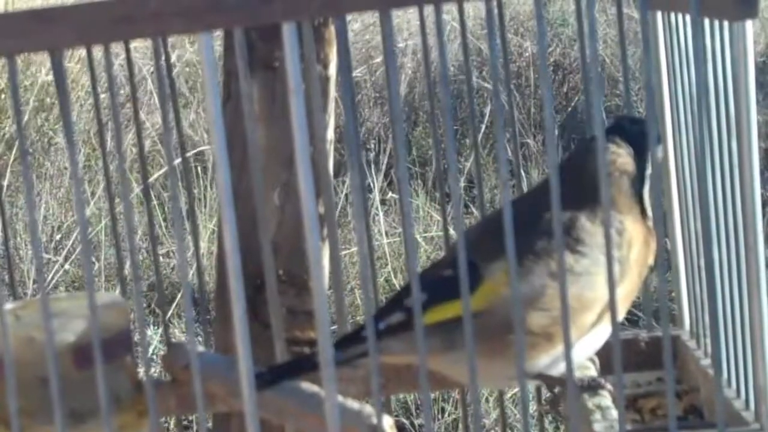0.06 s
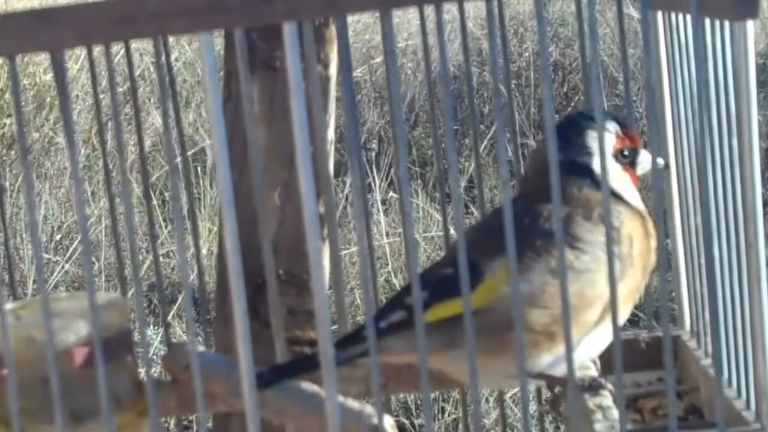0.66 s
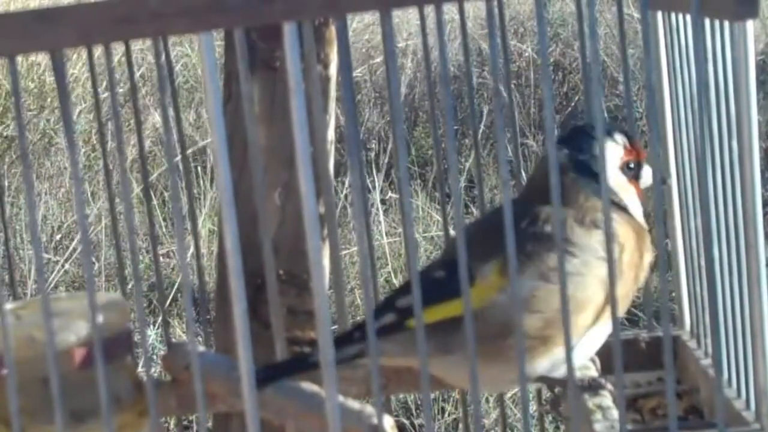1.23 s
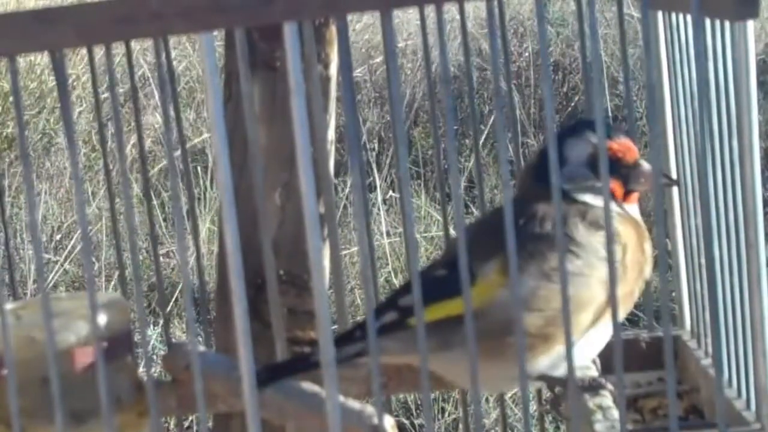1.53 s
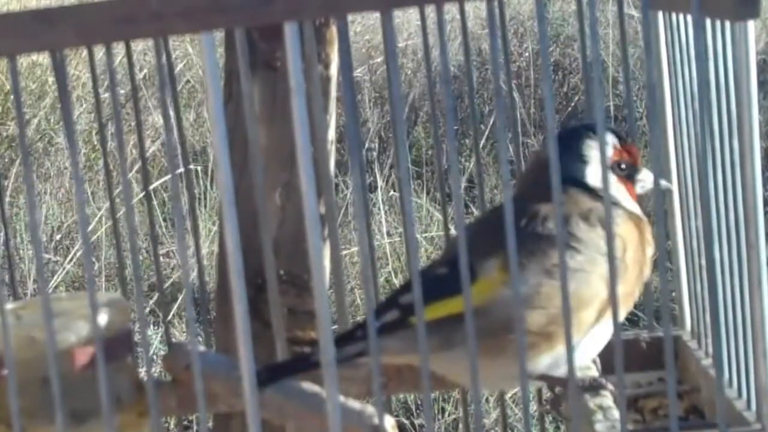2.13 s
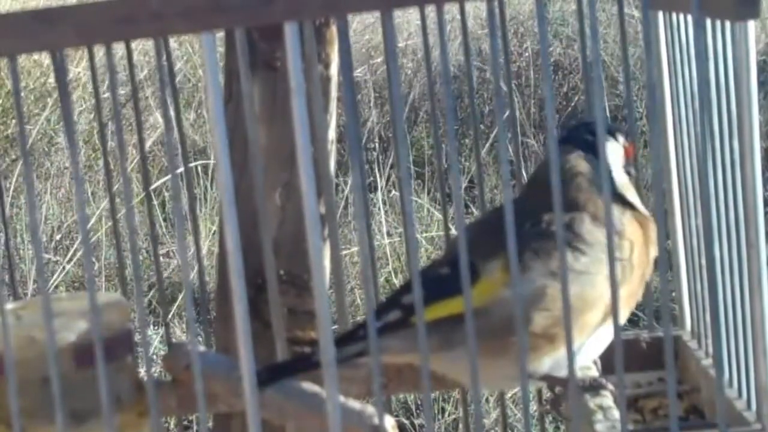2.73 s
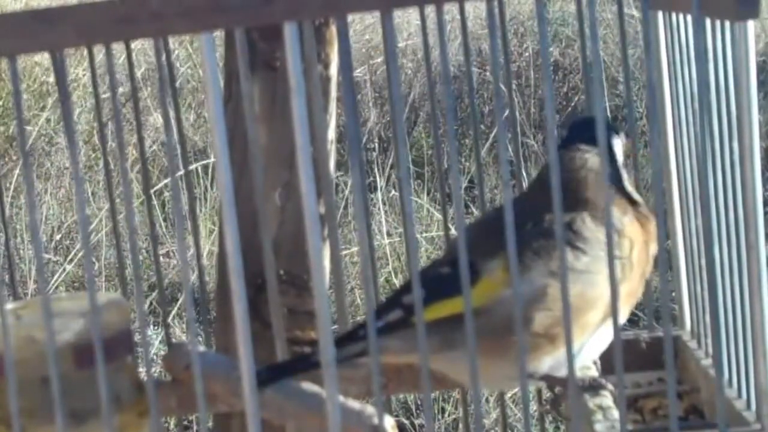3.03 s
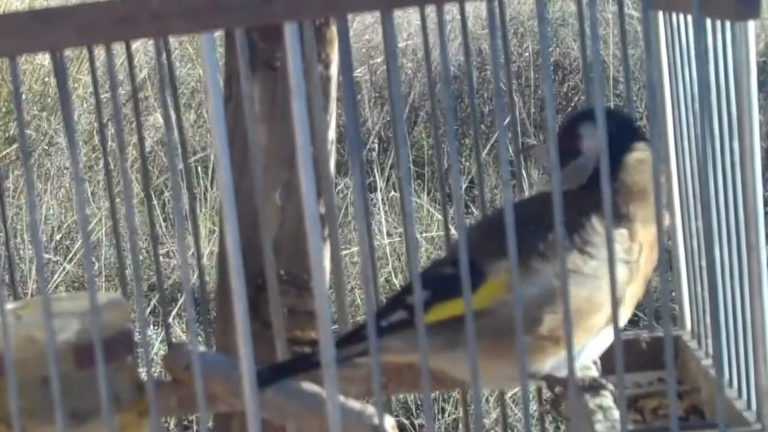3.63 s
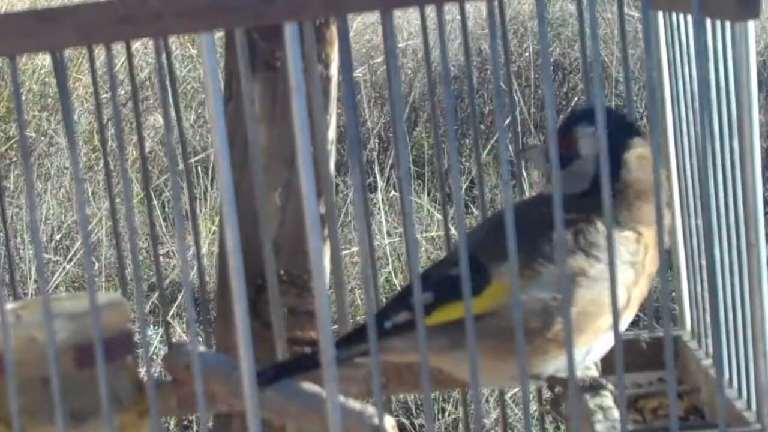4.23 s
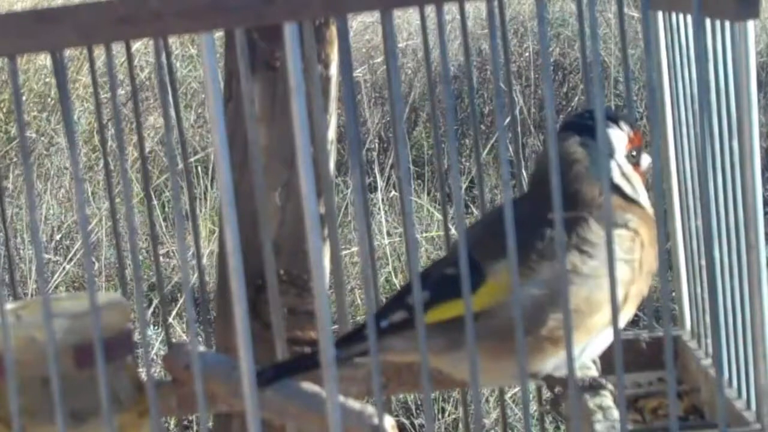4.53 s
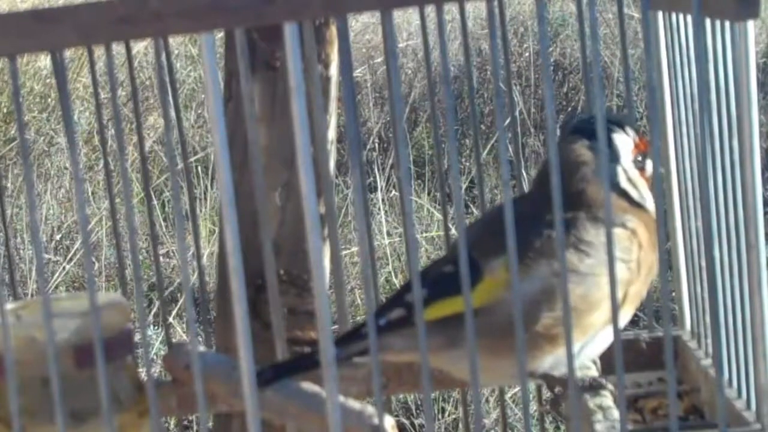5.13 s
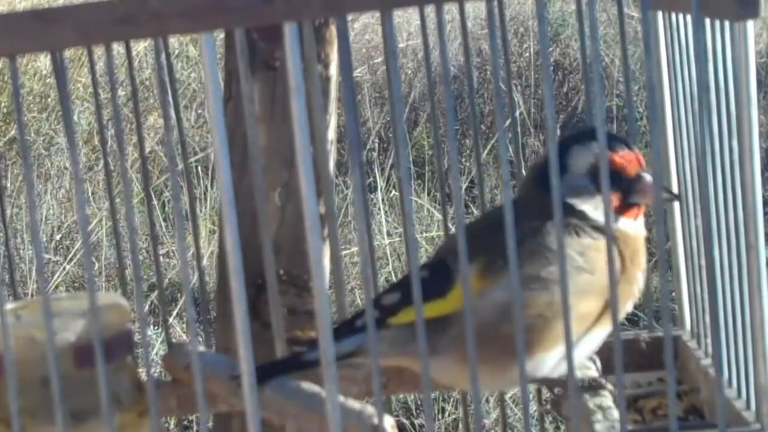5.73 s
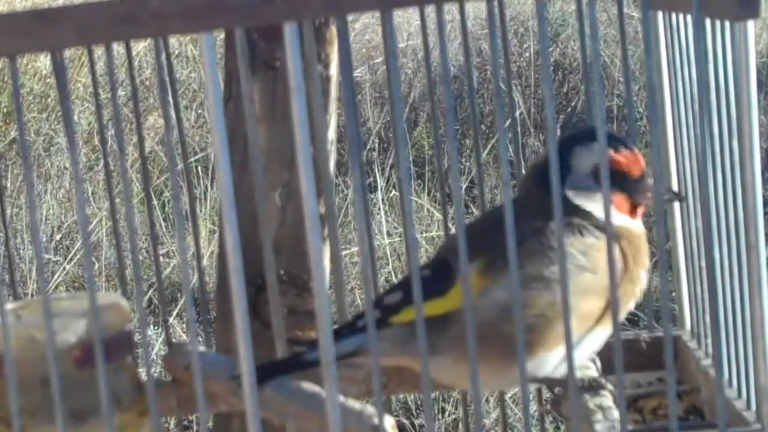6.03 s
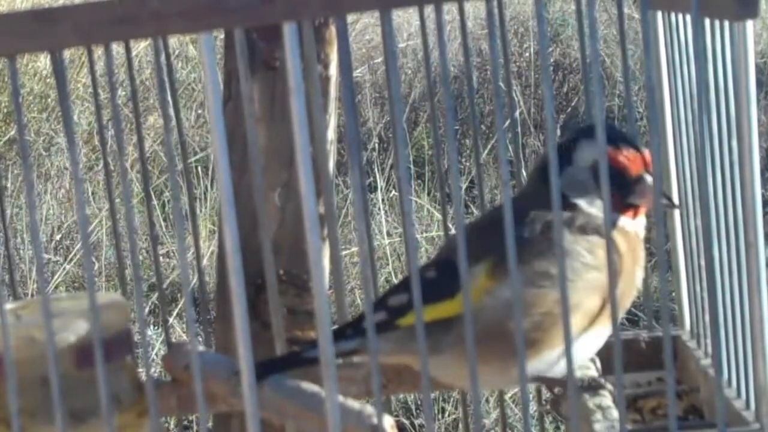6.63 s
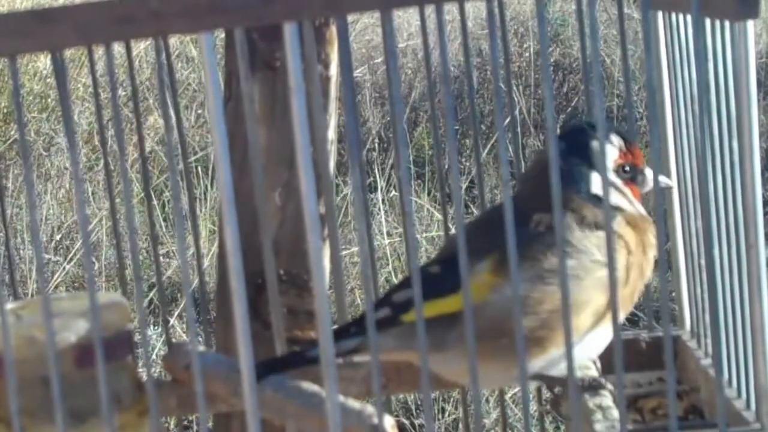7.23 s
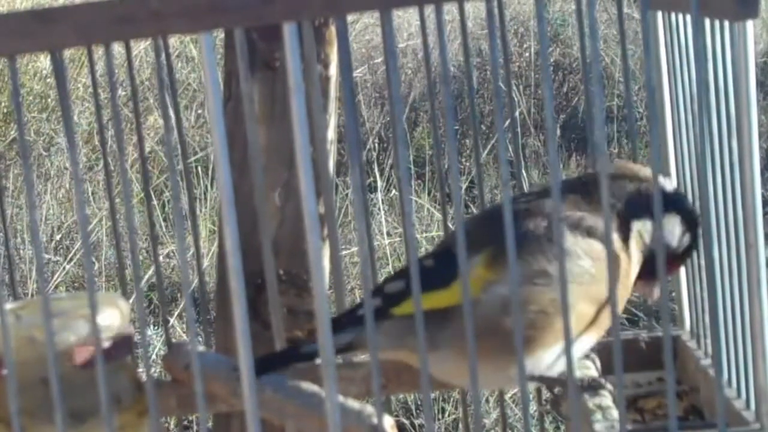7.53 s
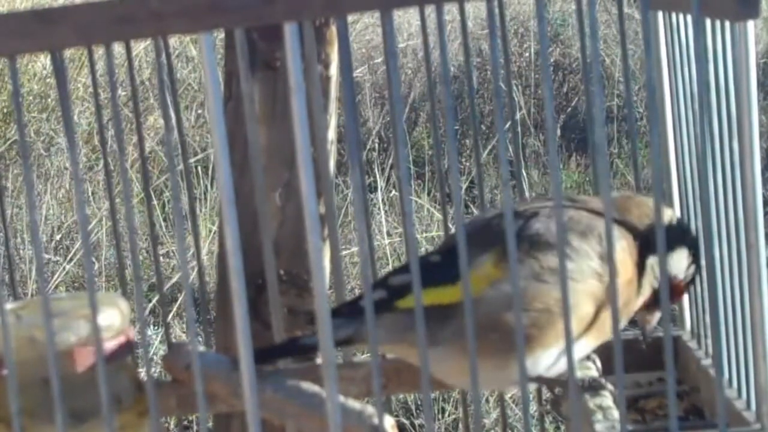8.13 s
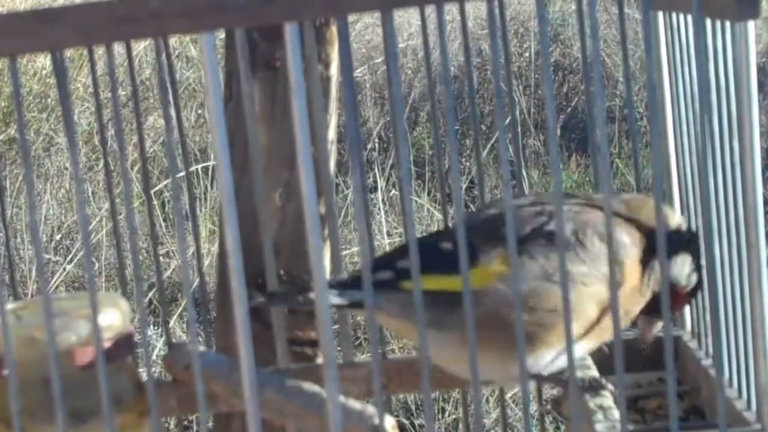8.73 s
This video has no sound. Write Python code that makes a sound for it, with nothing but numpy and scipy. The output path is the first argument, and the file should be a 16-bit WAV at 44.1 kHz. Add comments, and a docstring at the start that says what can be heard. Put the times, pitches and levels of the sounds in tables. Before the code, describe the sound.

A small caged finch chirps six times up close, each note brief, high and sharp, most with a soft rasping trail. Four come singly, then the wire cage gives one short ringing rattle, then two more follow in quick succession. Before and after, faraway birds answer each other with faint gliding notes. Underneath are a quiet outdoor hush, tiny claw and beak ticks, and light wind bumps on the microphone.

```python
"""A dry field under a quiet hush. Beak and claws tick on a cage, distant birds answer one another with
gliding notes, each echoed twice, and light puffs of wind bump the microphone. Near 2 s a thin whistle
rises far off. From 2.7 s a caged goldfinch, up close, gives six short, sharp calls: sweeps of its syrinx
coloured by throat and beak, most with a softer, rasping trail. Between the fourth and fifth call the
cage rattles once and rings. The distant birds have the last notes."""
import sys
import numpy as np
from scipy import signal
from scipy.fft import rfft, irfft, next_fast_len
from scipy.io import wavfile
from scipy.ndimage import map_coordinates

SR = 44100
rng = np.random.default_rng(int(sys.argv[2]) if len(sys.argv) > 2 else 0)


def put_to_file(sound):
    """Save the sound as 16-bit audio at rate SR, in the file named by the first command-line argument."""
    columns = np.atleast_2d(sound).T  # one column per channel
    safe = np.clip(columns, -1, 1)
    whole_steps = np.round(safe * 32767)
    wavfile.write(sys.argv[1], SR, whole_steps.astype(np.int16))


N = 391166
TIME = np.arange(N) / SR


def undb(db):
    """Decibels to gain."""
    return 10 ** (np.asarray(db) / 20)


def unit(x):
    """Scale to rms 1."""
    return x / np.sqrt(np.mean(x ** 2))


def add(out, start_s, sound):
    """Mix a sound in at a given time."""
    i = max(int(start_s * SR), 0)
    out[i:i + len(sound)] += sound[:max(len(out) - i, 0)]


def delay(x, lag_s):
    """The same sound, later."""
    return np.pad(x, (int(lag_s * SR), 0))[:N]


def decay(t, t60_s):
    """An envelope that falls 60 dB in t60_s."""
    return np.exp(-np.log(1000) * t / t60_s)


def walk(rate_hz, size):
    """A smooth random wobble with a spread of about 1."""
    knots = rng.standard_normal(int(size * rate_hz / SR) + 4)
    return map_coordinates(knots, [np.arange(size) * rate_hz / SR + 1], order=2)


def band(x, hz, octaves):
    """A band-pass, bell-shaped on a log-frequency axis."""
    size = next_fast_len(len(x))
    f = np.maximum(np.fft.rfftfreq(size, 1 / SR), 1)
    bell = np.exp(-.5 * (np.log2(f / hz) / octaves) ** 2)
    return irfft(rfft(x, size) * bell, size)[:len(x)]


def scatter(x, t60_s):
    """A short diffuse tail from bars, grass and ground."""
    t = TIME[:SR // 3]
    response = rng.standard_normal(len(t)) * decay(t, t60_s) * (1 - np.exp(-t / .003))
    return signal.fftconvolve(x, response / np.linalg.norm(response))[:N]


def glide(size, *points_hz):
    """Pitch along one smooth arc through evenly spaced points."""
    count = len(points_hz)
    arc = np.polyfit(np.linspace(0, 1, count), points_hz, count - 1)
    return np.polyval(arc, np.linspace(0, 1, size))


def hush(start_db=-54.5, ease_db_per_s=0.1344):
    """The outdoor bed: dark noise that eases off very slightly."""
    # tone of the hush: frequency_hz, relative_db
    spectrum = [(20, 3.5), (32, -8.5), (65, -9), (120, -12.5), (300, -14), (600, -15.5), (1200, -19.5),
                (2500, -22), (5000, -26.5), (10000, -30), (13800, -36.5)]
    hz, db = np.transpose(spectrum)
    size = next_fast_len(N)
    f = np.maximum(np.fft.rfftfreq(size, 1 / SR), 1)
    colour = undb(np.interp(np.log(f), np.log(hz), db))
    noise = irfft(rfft(rng.standard_normal(size)) * colour, size)[:N]
    return unit(noise) * undb(start_db - ease_db_per_s * TIME)


def click(db, hz, octaves, t60_s, rise_share=0.0699):
    """A brief burst coloured by a broad resonance; longer ones also start more softly."""
    t = TIME[:SR // 12]
    envelope = (1 - np.exp(-t / (rise_share * t60_s))) * decay(t, t60_s)
    burst = envelope * band(rng.standard_normal(len(t)), hz, octaves)
    return undb(db) * burst / np.abs(burst).max()


def ticks():
    """Tiny dry contacts of beak, claws and perch that die within milliseconds."""
    # contacts in the cage: start_s, peak_db, centre_hz, width_octaves, t60_s
    contacts = [(0.193, -43, 3000, 0.54, 0.063), (.512, -45.5, 7000, 0.43, 0.014),
                (1.164, -43.5, 7500, 0.74, 0.0099), (1.222, -33, 1020, 0.41, 0.0093),
                (1.222, -43.5, 7000, .6, 0.011), (1.267, -44, 5000, 1.1, 0.033),
                (1.727, -42, 6500, 0.64, 0.011), (2.385, -33, 7000, 1.5, 0.0073),
                (2.767, -42, 2900, 1, 0.02), (2.987, -49, 7000, 1, .015), (3.438, -49, 8000, 0.93, 0.0091),
                (4.015, -37, 6960, 0.58, 0.0081), (4.412, -47, 8000, 1, .012),
                (5.799, -45.5, 3990, 0.81, 0.018), (5.899, -47, 8000, 1.2, 0.011),
                (6.1675, -41, 9500, 0.7, 0.011), (7.219, -36.5, 7400, 0.4, 0.0069),
                (7.5733, -35.5, 7800, 0.49, 0.0072)]
    out = np.zeros(N)
    for start_s, db, hz, octaves, t60_s in contacts:
        add(out, start_s, click(db, hz, octaves, t60_s))
    return out


def far_birds(near_echo_s=.031, far_echo_s=.113, far_echo_db=-17, grass_db=-9.5, tail_db=-14,
              waver_db=0.1, jitter_hz=50):
    """Wavering glides, echoed by two surfaces; overlapping pairs are the two sides of one syrinx."""
    # distant notes: start_s, length_s, start_hz, middle_hz, end_hz, level_db, octave_db, near_echo_db
    notes = [ (.211, 0.041, 5920, 5620, 5300, -30.5, -30, -23),
             (.212, 0.035, 6300, 6420, 6070, -41.5, -22, -14),
             (0.651, 0.038, 5910, 5790, 5650, -49, -14, -13),
             (3.028, 0.028, 2480, 2980, 3160, -44, -11, -15),
             (3.174, 0.015, 2880, 3010, 3090, -52, -25, -14),
             (4.004, 0.046, 2080, 3670, 5200, -42.5, -19, -7),
             (5.498, 0.024, 2900, 3250, 3680, -50.5, -18, -4),
             (6.134, 0.018, 2720, 2770, 2920, -48, -25, -18),
             (6.738, 0.045, 2730, 3020, 3550, -57, -27, -14),
             (6.764, 0.045, 3300, 3830, 5030, -47, -24, -3),
             (7.254, 0.048, 6480, 5870, 5440, -44, -19, -11),
             (7.264, 0.03, 5980, 4830, 4270, -45, -15.5, -5),
             (7.67, 0.057, 5600, 6350, 4970, -64, -26, -12.5),
             (7.728, 0.028, 4650, 4200, 3850, -62, -25, -3),
             (7.832, 0.026, 4500, 4650, 4640, -62, -25, -15)]
    direct, near_echo = np.zeros(N), np.zeros(N)
    for start_s, length_s, *arc_hz, db, octave_db, near_echo_db in notes:
        size = int(length_s * SR)
        hz = glide(size, *arc_hz) + jitter_hz * walk(520, size)
        phase = 2 * np.pi * np.cumsum(hz) / SR
        swell = np.sin(np.linspace(0, np.pi, size)) * undb(db + waver_db * walk(216, size))
        note = swell * (np.sin(phase) + undb(octave_db) * np.sin(2 * phase))
        add(direct, start_s, note)
        add(near_echo, start_s + near_echo_s, undb(near_echo_db) * note)
    out = direct + near_echo + undb(far_echo_db) * delay(direct, far_echo_s)
    # paths through the grass arrive just behind the note and roughen it
    grass = undb(grass_db) * scatter(out, t60_s=0.099)
    return out + grass + undb(tail_db) * scatter(out, t60_s=0.2)


def wind(rumble_hz=120, octaves=0.75, calm_db=-74):
    """Eddies at the microphone: single pressure swings over a low rumble that swells with each puff."""
    # puffs of the breeze: crest_s, level_db, width_s
    gusts = [(.42, -56, .035), (1.12, -49, .018), (3.14, -58, 0.061), (4.04, -47.5, 0.07),
             (4.29, -55, 0.047), (6.96, -52, 0.11)]
    # eddies bumping the microphone: centre_s, peak_db, pitch_hz
    bumps = [(1.13, -42.5, 225), (3.126, -36, 200), (3.131, -41, 330), (3.955, -44, 100), (3.996, -42, 85),
             (4.032, -35, 152), (4.04, -41, 286), (4.079, -45, 130), (4.186, -44, 190), (4.299, -43.5, 80),
             (4.313, -46, 110), (6.9554, -33.5, 152), (6.973, -41, 150), (7.021, -40, 115)]
    puffs = sum(undb(db) * np.exp(-np.abs(TIME - crest_s) / width_s) for crest_s, db, width_s in gusts)
    out = (undb(calm_db) + puffs) * unit(band(rng.standard_normal(N), rumble_hz, octaves))
    for centre_s, db, hz in bumps:
        phase = 2 * np.pi * hz * (TIME - centre_s)
        near = np.abs(phase) < 2 * np.pi
        out[near] += undb(db) * phase[near] * np.exp((1 - phase[near] ** 2) / 2)
    return out


def whistler(tail_db=-13, pitch_waver=.005, waver_db=2.5, fade_s=.012):
    """A thin, wavering whistle from across the field, in two parts."""
    # the faint opening: time_s, pitch_hz, level_db
    opening = [(1.765, 2520, -70), (1.775, 2290, -67), (1.873, 2380, -69), (1.895, 2413, -71)]
    # the longer rise: time_s, pitch_hz, level_db
    rise = [(1.95, 2669, -60), (1.966, 2770, -60), (1.988, 2669, -61), (2.06, 2759, -60),
            (2.112, 2890, -57.5), (2.184, 2934, -55.5), (2.252, 2985, -57.5), (2.275, 3000, -70)]
    out = np.zeros(N)
    for part in (opening, rise):
        time_s, hz, db = np.transpose(part)
        t = TIME[int(time_s[0] * SR):int(time_s[-1] * SR)]
        pitch_hz = np.interp(t, time_s, hz) * (1 + pitch_waver * walk(59, len(t)))
        tone = unit(np.sin(2 * np.pi * np.cumsum(pitch_hz) / SR))
        fade = np.clip(np.minimum(t - t[0], t[-1] - t) / fade_s, 0, 1)
        swell = undb(np.interp(t, time_s, db) + waver_db * walk(40, len(t)))
        add(out, time_s[0], fade * swell * tone)
    return out + undb(tail_db) * scatter(out, t60_s=0.2)


def syllable(t, attack_s, arc_hz, second_db, third_db, rough, fundamental=1, flutter=0,
             jitter=0.015, shimmer_db=1., throb_db=1.7):
    """One sweep of the syrinx: effort swells and falls as harmonics slide through throat resonances."""
    # what throat and beak let through: frequency_hz, gain_db
    throat = [(1900, -7), (2500, -1.5), (3300, 1), (4200, 4), (5300, 1), (6200, 2), (7100, -6.5),
              (8100, -2), (10000, -4), (11000, -4), (14000, -11)]
    throat_hz, throat_db = np.transpose(throat)
    effort = np.interp(t, [0, attack_s, t[-1]], [0, 1, 0]) * undb(rough * throb_db * walk(400, len(t)))
    hz = glide(len(t), *arc_hz) * (1 + rough * jitter * walk(1500, len(t)))
    phase = 2 * np.pi * np.cumsum(hz) / SR + flutter
    overtones_db = [second_db, third_db, third_db - 6, third_db - 7]
    # overtones grow faster with effort than the fundamental
    gains = [fundamental * effort ** 0.69] + [undb(db) * effort ** 0.99 for db in overtones_db]
    tone = 0
    for k, gain in enumerate(gains, 1):
        colour_db = np.interp(np.log(k * hz), np.log(throat_hz), throat_db)
        flicker_db = k * rough * shimmer_db * walk(700, len(t))  # higher harmonics are less steady
        tone = tone + gain * undb(colour_db + flicker_db) * np.sin(k * phase)
    return tone * (1 + flutter)


def syrinx(break_s=0.0012, lead_s=.0045, lead_db=-27.5,
           trail_rough=0.83, trail_attack_share=0.41, flutter_hz=450, flutter_spread=.3):
    """Chirps that change register, fluttering trails and snaps; returns the voice and a hiss envelope."""
    # the sharp sweep of each call: start_s, length_s, attack_s, start_hz, one_third_hz, two_thirds_hz,
    # end_hz, level_db, second_harmonic_db, third_harmonic_db, change_after_s, step_db, roughness (0-1)
    chirps = [(2.6547, 0.029, 0.022, 2365, 2807, 3346, 3880, -10.5, -13, -18.5, 0.021, -5, 0.9),
              (3.6688, 0.0285, 0.015, 2110, 2510, 2796, 2850, -15.5, -18.5, -17.5, 0.0119, -17, 0.43),
              (4.7501, 0.03, 0.0063, 3010, 2315, 2020, 2050, -29, -7.5, -11.5, 0.024, -1, 0.3),
              (5.1466, 0.027, 0.012, 2246, 2480, 2742, 2620, -14.5, -2.5, -7, 0.019, -18, 0.32),
              (6.4863, 0.025, 0.013, 2370, 2686, 3173, 2960, -14, -6.5, -15, 0.019, 4, 1),
              (6.5929, 0.034, 0.0095, 1940, 2946, 3580, 3950, -14.5, -15, -9.5, 0.0145, -5, 1)]
    # soft, often rasping sounds after a call; the one at 3.74 s is a faint echo: start_s, length_s,
    # start_hz, middle_hz, end_hz, level_db, second_harmonic_db, third_harmonic_db, flutter_depth
    trails = [(2.685, 0.0079, 3920, 3530, 3180, -23, -23, -20, 0.2),
              (2.69, 0.027, 3030, 3340, 3060, -31, -34, -40, 0.85),
              (3.69, 0.018, 3150, 2940, 2650, -31.5, -21, -32, 0.54),
              (3.709, 0.021, 3150, 3100, 3030, -40, -11, -8, 0.1),
              (3.736, 0.028, 3100, 3120, 3130, -54, -12, -20, 0.1),
              (5.17, 0.025, 2694, 2560, 2620, -40, -12, -24, 0.3),
              (6.507, 0.022, 3370, 3310, 3160, -32.5, -25, -20, 0.3),
              (6.526, 0.015, 3050, 3150, 3220, -37, -28, -32, 0.25),
              (6.619, 0.018, 3600, 3440, 3350, -29.5, -32.5, -32, 1.1),
              (6.634, 0.012, 3900, 3800, 3670, -42, -24, -30, 0.4)]
    # the syrinx snapping as it starts or changes register: start_s, peak_db
    snaps = [(2.67, -23.5), (3.6803, -30), (3.695, -29), (5.147, -25), (6.4856, -31), (6.5105, -30),
             (6.592, -28), (6.6165, -26)]
    voice, hiss_envelope = np.zeros(N), np.zeros(N)
    lead_t = TIME[:int(2 * lead_s * SR)]
    for start_s, length_s, attack_s, *arc_hz, db, second_db, third_db, after_s, step_db, rough in chirps:
        t = TIME[:int(length_s * SR)]
        # the change of register steps the level of the fundamental
        register = undb(step_db * np.clip((t - after_s) / break_s, 0, 1))
        note = undb(db) * syllable(t, attack_s, arc_hz, second_db, third_db, rough, fundamental=register)
        add(voice, start_s, note)
        add(hiss_envelope, start_s, rough * np.abs(note))
        # a faint pure tone leads into the chirp
        lead = np.hanning(len(lead_t)) * np.sin(2 * np.pi * arc_hz[0] * lead_t)
        add(voice, start_s - lead_s, undb(db + lead_db) * lead)
    for start_s, length_s, *arc_hz, db, second_db, third_db, depth in trails:
        t = TIME[:int(length_s * SR)]
        turns = np.cumsum(flutter_hz * (1 + flutter_spread * walk(650, len(t)))) / SR
        flutter = depth * np.hanning(len(t)) * np.sin(2 * np.pi * turns)
        attack_s = trail_attack_share * length_s
        trail = undb(db) * syllable(t, attack_s, arc_hz, second_db, third_db, trail_rough, flutter=flutter)
        add(voice, start_s, trail)
        add(hiss_envelope, start_s, trail_rough * np.abs(trail))
    for start_s, db in snaps:
        add(voice, start_s, click(db, hz=3490, octaves=1.0, t60_s=0.0051))
    return voice, hiss_envelope


def goldfinch(hiss_db=-23, hiss_linger_s=0.0052, hiss_hz=5500, hiss_octaves=1.2,
              echo_s=0.035, echo_db=-30, tail_db=-29):
    """The near bird: sharp call notes, then a blurred echo and a short tail."""
    voice, hiss_envelope = syrinx()
    # a broad hiss that swells with each call and lingers a few milliseconds
    pole = np.exp(-1 / (hiss_linger_s * SR))
    swell = signal.lfilter([1 - pole], [1, -pole], hiss_envelope)
    hiss = unit(band(rng.standard_normal(N), hiss_hz, hiss_octaves))
    direct = voice + undb(hiss_db) * swell * hiss
    # the surroundings give back little of the top
    dull = band(direct, hz=2980, octaves=1.1)
    echo = delay(scatter(dull, t60_s=0.012), echo_s)
    return direct + undb(echo_db) * echo + undb(tail_db) * scatter(dull, t60_s=0.18)


def cage(ring_db=-37, crack_db=-21, crack_s=0.00092, bounce_s=0.004, bounce_db=-12,
         buzz_db=-40, buzz_s=0.012):
    """One rattle: each knock is a crack, a small rebound and a buzz of wires over the ringing frame."""
    # resonances of the cage: pitch_hz, relative_db, t60_s
    modes = [(945, -2.5, 0.15), (1080, 1, 0.073), (1293, 4, 0.07), (1374, -7, 0.076), (1630, -2, .04),
             (1780, 4, 0.044), (2260, 1, 0.091), (2490, 5, 0.082), (2800, 13, 0.017), (3220, -5, 0.079),
             (3550, -18, 0.089), (4400, -20, .04), (5000, -1.5, 0.068), (6440, 3, .025), (6860, -15, 0.04),
             (7070, 2, .03), (7620, 4, 0.033), (9700, -16, .035), (11000, -17, .02)]
    # knocks of the rattle: start_s, level_db, brightness_db (extra gain on crack and buzz)
    knocks = [(5.57, -14.5, -10), (5.5913, -3, -2), (5.6134, -5, 1.5)]
    out, t = np.zeros(N), TIME[:SR // 5]
    ring = sum((-1) ** k * undb(db) * np.sin(2 * np.pi * hz * t) * decay(t, t60_s)
               for k, (hz, db, t60_s) in enumerate(modes))
    envelope = undb(crack_db) * np.exp(-t / crack_s) + undb(buzz_db) * np.exp(-t / buzz_s)
    for start_s, db, brightness_db in knocks:
        noise = unit(band(rng.standard_normal(len(t)), hz=3000, octaves=1.6))
        impact = undb(db + brightness_db) * envelope * noise
        add(out, start_s, impact + undb(db + ring_db) * ring)
        add(out, start_s + bounce_s, undb(bounce_db) * impact)
    return out


def scene():
    """Everything reaches one microphone, the same in both channels."""
    mono = hush() + wind() + goldfinch() + far_birds() + whistler() + cage() + ticks()
    return np.array([mono, mono])


def record(dry):
    """The recorder cuts the top steeply above 14 kHz."""
    return signal.sosfilt(signal.ellip(10, .2, 70, 14000, fs=SR, output="sos"), dry)


dry = scene()
out = record(dry)
put_to_file(out)
```